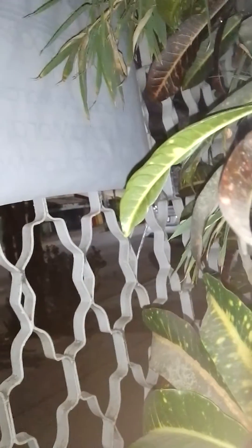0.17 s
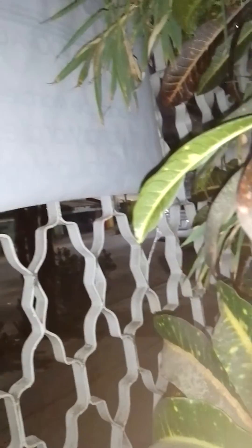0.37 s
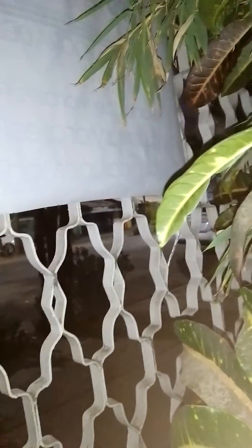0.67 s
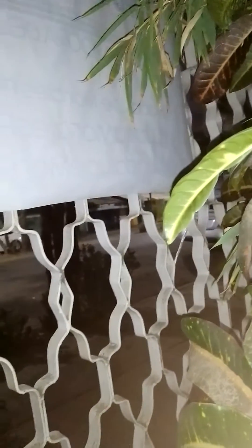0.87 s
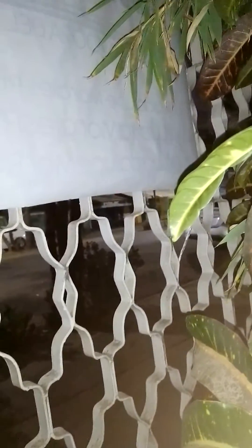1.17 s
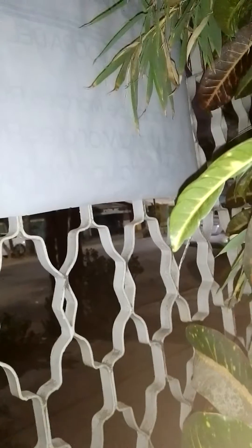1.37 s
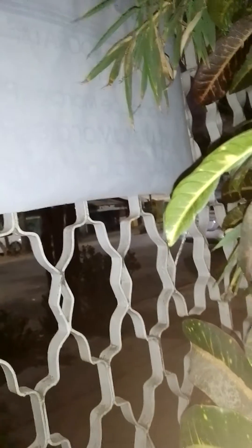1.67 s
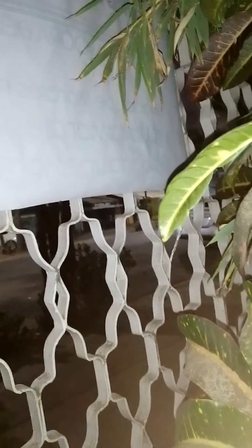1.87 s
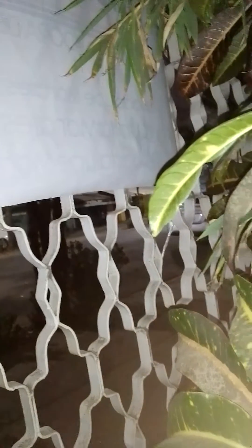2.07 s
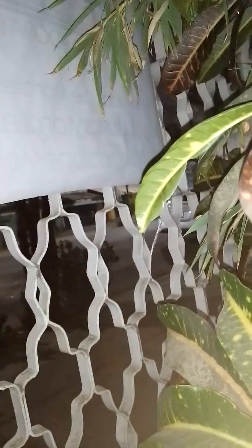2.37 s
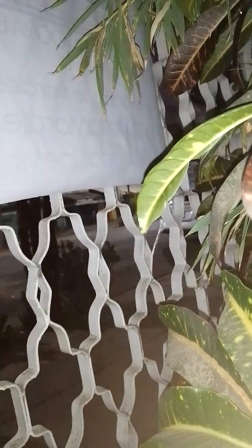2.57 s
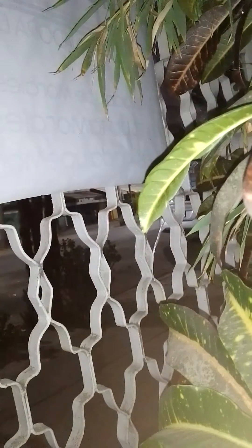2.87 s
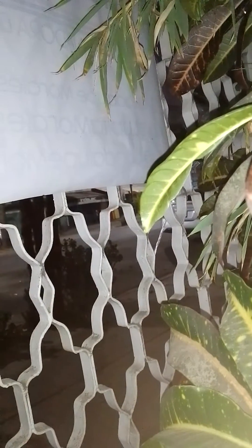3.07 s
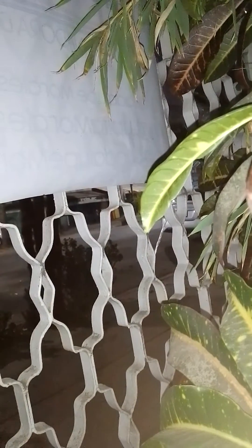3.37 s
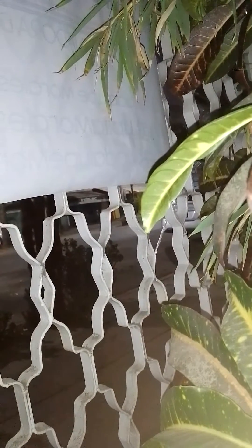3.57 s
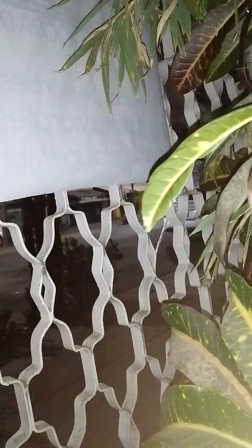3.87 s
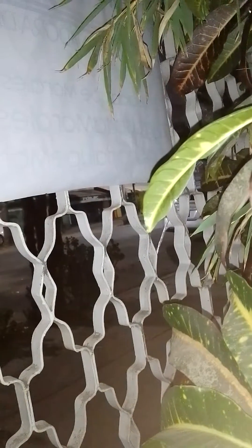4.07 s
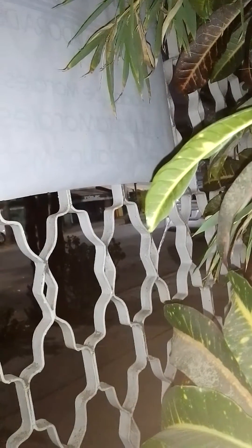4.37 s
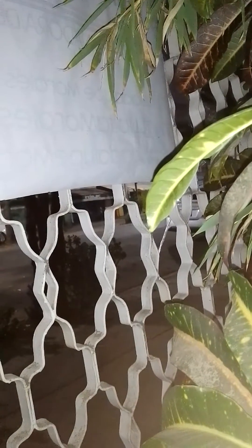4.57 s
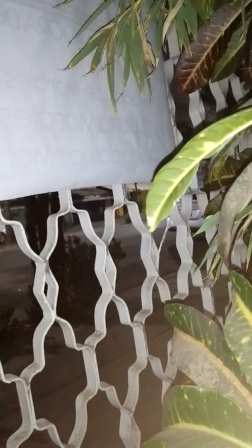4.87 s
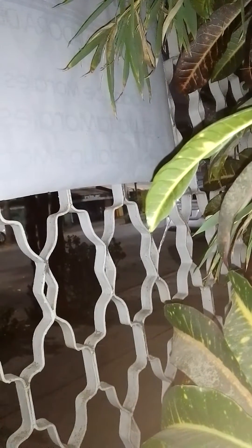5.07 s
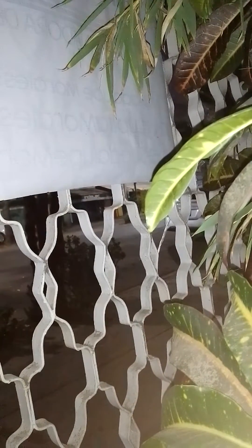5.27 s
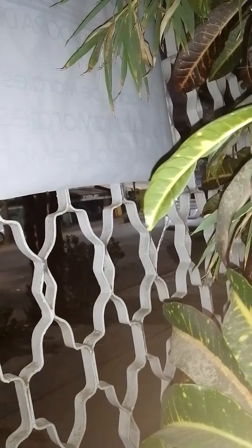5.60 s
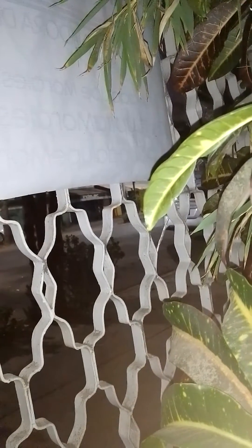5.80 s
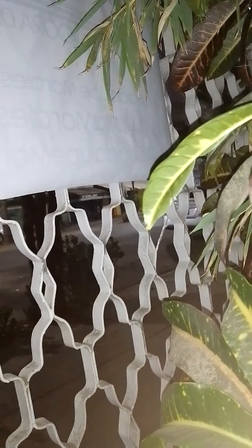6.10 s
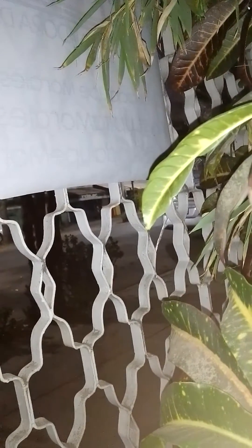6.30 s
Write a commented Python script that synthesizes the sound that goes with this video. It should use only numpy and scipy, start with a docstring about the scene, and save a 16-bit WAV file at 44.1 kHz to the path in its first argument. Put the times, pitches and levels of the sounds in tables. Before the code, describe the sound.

A busy crowd of small birds chirps near a garden fence and walls, high, scratchy and fast, with a few clearer sliding notes. There are short thinner moments but no silence. Behind them, very quiet, a street hums, tyres drone past and an engine gathers speed; a distant bird whistle slides upward before the middle. A harsh horn starts right at the end. Mono phone sound, slightly reverberant.

```python
"""Sparrows chirp hoarsely in the trees of a small garden by a street at dawn, their notes overlapping.
Each note is a trembling sine with raspy overtones, many amid fainter peeps; leaves and walls smear it with
fading noise. Far off a bird whistles and an engine gathers speed, both gliding sines, over traffic hum and
tyre drone, both filtered noise. At the end a vehicle horn sets in: steady partials over a rattle. Mono."""
import sys
import numpy as np
from scipy import signal
from scipy.fft import rfft, irfft
from scipy.io import wavfile

SR = 44100
rng = np.random.default_rng(int(sys.argv[2]) if len(sys.argv) > 2 else 0)


def how_loud(loudness_db):
    """Turn decibels into a plain amplitude multiplier (0 dB gives 1, 20 dB gives 10)."""
    steps = np.asarray(loudness_db, float) / 20
    return 10 ** steps


def waveform_to_disk(signal):
    """Save audio, clipped to [-1, 1], as 16-bit WAV at the path in sys.argv[1]."""
    frames = np.transpose(np.atleast_2d(signal))
    scaled = np.clip(frames, -1, 1) * 32767
    samples = np.round(scaled).astype(np.int16)
    wavfile.write(sys.argv[1], SR, samples)


N = 284004  # length in samples


def unit(x):
    """Scale to rms 1."""
    return x / np.sqrt(np.mean(x ** 2, axis=-1, keepdims=True))


def colour(x, points):
    """Filter by (Hz, dB) points joined on a log frequency axis."""
    hz, db = np.transpose(points)
    bins = np.maximum(np.fft.rfftfreq(len(x), 1 / SR), 1)
    gain = how_loud(np.interp(np.log(bins), np.log(hz), db))
    return irfft(rfft(x) * gain, len(x))


def wander(shape, rate_hz):
    """Random wavering: noise smoothed to the given rate, spread 1."""
    smooth = signal.butter(2, rate_hz, fs=SR, output="sos")
    return unit(signal.sosfilt(smooth, rng.standard_normal(shape)))


def band_noise(low_hz, high_hz, order, count):
    """A band of steady noise at rms 1."""
    band = signal.butter(order, [low_hz, high_hz], "bandpass", fs=SR, output="sos")
    return unit(signal.sosfilt(band, rng.standard_normal(count)))


def glide(table, waver, throb_db):
    """A sine along (s, Hz, dB rms) rows, silent outside them, its pitch and size wavering."""
    s, hz, db = np.transpose(table)
    t = np.arange(N) / SR
    pitch = np.interp(t, s, hz) * (1 + waver * wander(N, rate_hz=28.0))
    size = how_loud(np.interp(t, s, db, -140, -140) + throb_db * wander(N, rate_hz=75))
    return np.sqrt(2) * size * np.sin(2 * np.pi * np.cumsum(pitch) / SR)


def garden(x, t60_s, wet_db):
    """Leaves and walls scatter the sound: the direct wave, then a fading noise tail."""
    t = np.arange(SR // 2) / SR
    tail = rng.standard_normal(len(t)) * how_loud(-60 * t / t60_s)
    tail = how_loud(wet_db) * tail / np.sqrt(np.sum(tail ** 2))
    tail[0] = 1
    return signal.fftconvolve(x, tail)[:N]


# Tone of the street hum. Each row: frequency in Hz, relative strength per Hz of bandwidth in dB.
STREET_TONE = [(25, -20.5), (55, -32.5), (110, -13.5), (165, -23), (205, -8), (290, 1.5), (500, -4),
               (945, -5.5), (1400, -15.5), (1900, -22), (2420, -15.5), (3230, -26), (4540, -33.5),
               (15500, -30.5)]
# Tyre drone of a passing vehicle. Each row: time in seconds, level in dB rms.
TYRE_DRONE = [(0, -90), (1.5, -72), (1.8, -67), (3.1, -66), (3.5, -70), (6.44, -83)]


def street():
    """Smooth far traffic is coloured noise; a narrow band of tyre drone swells and fades in it."""
    level = how_loud(-61.0 + 0.69 * wander(N, rate_hz=18.4))
    hum = level * unit(colour(rng.standard_normal(N), STREET_TONE))
    # the upper part of the hum comes and goes in patches
    upper_band = signal.butter(2, [1250, 2600], "bandpass", fs=SR, output="sos")
    upper = signal.sosfilt(upper_band, hum)
    hum = hum + upper * (how_loud(3.5 * wander(N, rate_hz=8)) - 1)
    s, db = np.transpose(TYRE_DRONE)
    drone_level = how_loud(np.interp(np.arange(N) / SR, s, db))
    return hum + drone_level * band_noise(780, 880, 2, N)


# Far engine. Each row: time in seconds, firing rate in Hz, level in dB rms before wavering.
ENGINE_RUN = [(.7, 76, -87.5), (1.5, 88, -93), (2.0, 95, -85), (2.8, 102, -76), (3.15, 105, -79.5),
              (3.5, 109, -71), (4.2, 114.5, -83), (4.8, 118, -99), (5.6, 121, -84.5), (6.44, 124, -88)]


def engine():
    """The firing of the cylinders is heard as one low tone that climbs with engine speed."""
    return glide(ENGINE_RUN, waver=0.012, throb_db=0.5)


# Far bird whistles, one list each. Each row: time in seconds, pitch in Hz, level in dB rms before wavering.
WHISTLE_NOTES = [
    [(.6, 1500, -88), (.66, 1540, -78), (.72, 1550, -88)],
    [(1.5, 1425, -91), (1.58, 1506, -78), (1.72, 1600, -71.5), (1.8, 1545, -75)],
    [(2.47, 980, -78), (2.52, 1080, -66), (2.6, 1372, -73), (2.66, 1580, -68), (2.72, 1880, -67),
     (2.765, 2240, -62), (2.775, 2320, -85)],
]


def whistles():
    """A whistle is nearly a pure tone: one sine sliding through each list of pitches."""
    return sum(glide(note, waver=.012, throb_db=6.5) for note in WHISTLE_NOTES)


# Strong horn partials. Each row: frequency in Hz, level in dB rms before throbbing.
HORN_PARTIALS = [(1050, -67), (1136, -58), (1200, -56), (1394, -57), (1510, -61), (2178, -52.5),
                 (2224, -60), (2264, -49), (2347, -60), (2522, -51), (2649, -52.5), (2866, -52)]
# The base pitches in Hz of the two horn diaphragms.
DIAPHRAGM_HZ = (378, 349)
BUZZ_DB, BUZZ_DB_PER_KHZ = -57.5, -6.5  # level of the 9th harmonic, change above it
HORN_START_S, HORN_THROB_DB = 6.215, 5


def horn():
    """Buzzing diaphragms: partials of steady pitch and throbbing level over a rattle, swelling in."""
    t = np.arange(N - int(HORN_START_S * SR)) / SR
    # a thin upper buzz of harmonics that fade with pitch
    buzz = [(k * hz, BUZZ_DB + BUZZ_DB_PER_KHZ * (k - 9) * hz / 1000)
            for hz in DIAPHRAGM_HZ for k in range(9, 22)]
    partials = list(HORN_PARTIALS) + buzz
    throbs = wander((len(partials), len(t)), rate_hz=110)
    phases = rng.uniform(0, 2 * np.pi, len(partials))
    tone = np.zeros(len(t))
    for (hz, db), throb, phase in zip(partials, throbs, phases):
        level = np.sqrt(2) * how_loud(db + HORN_THROB_DB * throb)
        tone += level * np.sin(2 * np.pi * hz * t + phase)
    rattle = how_loud(-50) * band_noise(2100, 6500, 4, len(t))
    swell = 1 - np.exp(-t / .07)
    return np.r_[np.zeros(N - len(t)), (tone + rattle) * swell]


# Overtones of a sparrow note. Each row: multiple of the pitch, level in dB added to the note's overtone level.
NOTE_OVERTONES = [(2, -0.5), (3, 1.5), (4, -3)]


def voice(hz, db, over_db, size):
    """The note sung along a pitch and level; gives the note and its raspier overtones."""
    n = len(hz)
    phase = 2 * np.pi * np.cumsum(hz) / SR
    rasp = 2 * np.pi * np.cumsum(200 * size[::-1][:n]) / SR  # pitch tremble, spread 200 Hz
    shape = how_loud(db) * np.sin(np.pi * np.arange(n) / n) ** 0.75
    over = np.zeros(n)
    for k, relative_db in NOTE_OVERTONES:
        audible = k * hz < .45 * SR
        over += how_loud(over_db + relative_db) * audible * np.sin(round(k) * phase + rasp)
    return np.array([shape * np.sin(phase), shape * over])


# birds at LEVEL_HZ and above have no sag; the flick is FLICK_HZ deep at LEVEL_HZ and shallower below
LEVEL_HZ, FLICK_HZ, FLICK_S = 5958, 612, 0.00491


def chirp(length, mid_hz, sag_hz_per_s, db, over_db, pitch, size):
    """One hoarse note that flicks up to its pitch from below and sags, trembling in pitch and size."""
    t = np.arange(int(np.clip(length, .01, .14) * SR)) / SR
    sag = sag_hz_per_s * (t - t[-1] / 2)
    flick = FLICK_HZ * (mid_hz / LEVEL_HZ) ** 2 * np.exp(-t / FLICK_S)
    hz = mid_hz - sag - flick + 95 * pitch[:len(t)]
    return voice(hz, db + 9 * np.tanh(size[:len(t)] / 2), over_db, size)


def slur(rise, fall, start_hz, turn_hz, end_hz, db, over_db, pitch, size):
    """One clearer note that glides to its turning pitch, then slides to its end, fast at first."""
    t = np.arange(int((rise + fall) * SR)) / SR
    up = np.clip(t / rise, 0, 1)
    down = np.clip((t - rise) / fall, 0, 1) ** .75  # a power under 1 is steep first
    hz = start_hz + (turn_hz - start_hz) * up + (end_hz - turn_hz) * down
    return voice(hz + 105 * pitch[:len(t)], db + 6 * size[:len(t)], over_db, size)


def add(out, s, part):
    """Mix a part into out from time s."""
    start = int(max(s, 0) * SR)
    out[:, start:start + part.shape[1]] += part


# Peeps around a chirp: typical fall rate and length, mean level against the chirp and its spread
PEEP_SAG_HZ_PER_S, PEEP_S = 7020, 0.034
PEEP_DB, PEEP_SCATTER_DB = -9.5, 4.5


def peeps(out, row, pitch, size, count=15):
    """Short, mostly fainter peeps on pitches near a chirp, the later ones tending lower."""
    s, length, hz, db, over_db = row
    for k, (off, slope, loud, long) in enumerate(rng.standard_normal((count, 4))):
        late = k / count
        spread_hz = 600 * (.6 + .7 * late)
        shift_hz = spread_hz * np.clip(off, -1.6, 1.6) + 502 * (.3 - late)
        peep_hz = np.clip(hz + shift_hz, 2850, 6400)
        sag = PEEP_SAG_HZ_PER_S * np.clip(1 + slope, -1, 2)
        peep_db = db + PEEP_DB + PEEP_SCATTER_DB * loud
        peep = chirp(PEEP_S * how_loud(2.54 * long), peep_hz, sag, peep_db, over_db,
                     pitch[::-1][400 * k:], size[400 * k:])
        add(out, s + (length + PEEP_S) * late - .006, peep)


# Sparrow chirps. Each row: start in seconds, length in seconds (held to 0.01-0.14 when sung), pitch in Hz,
# level in dB before trembling, overtone level in dB against the note.
CHIRP_NOTES = [(0, 0.016, 3440, -51.5, -29), (0.067, 0.032, 5660, -61, 1), (0.081, 0.076, 4380, -45, -22),
               (0.115, 0.11, 3575, -47, -42), (0.209, 0.049, 3220, -57, -26),
               (0.362, 0.051, 5800, -46, -10), (0.376, .11, 3927, -44, -17),
               (0.38, 0.041, 6040, -48.5, -23), (0.444, 0.093, 5080, -43.5, -11),
               (0.464, 0.078, 4095, -41, -8), (0.615, 0.11, 4840, -46, -15), (0.644, 0.061, 3725, -46, -15),
               (0.705, 0.096, 3853, -39, -21), (0.822, 0.078, 3230, -49.5, -46),
               (1.01, 0.044, 4060, -46.5, -33), (1.047, 0.065, 3222, -43, -32),
               (1.133, 0.054, 4990, -43.5, -9.5), (1.179, 0.085, 4060, -41, -19.5),
               (1.221, 0.12, 3680, -45.5, -18.5), (1.333, 0.076, 4110, -40.5, -19.5),
               (1.337, 0.1, 3480, -43, -31), (1.449, 0.047, 6570, -58.5, -9),
               (1.466, 0.11, 3457, -42.5, -30), (1.483, 0.043, 5780, -47, -10),
               (1.58, 0.063, 5125, -48, -9), (1.632, 0.18, 3680, -46.5, -9), (1.692, 0.092, 4690, -52, -2),
               (1.778, 0.033, 4755, -41.5, -10), (1.824, 0.032, 4390, -38, -29),
               (1.841, 0.058, 3630, -40, -26.5), (1.957, 0.031, 4790, -45.5, -12),
               (1.985, 0.13, 4175, -43, -17.5), (2.004, 0.088, 3143, -46.5, -14),
               (2.084, 0.078, 3494, -43.5, -23), (2.296, 0.029, 5220, -56.5, -11),
               (2.36, 0.12, 3270, -52, -14), (2.364, 0.075, 5470, -52, -19),
               (2.539, 0.045, 4780, -42.5, -10.5), (2.563, 0.095, 3770, -40.5, -20),
               (2.723, 0.052, 4750, -46.5, -6.5), (2.759, 0.067, 4020, -39, -21),
               (2.866, 0.096, 4700, -43, -21), (2.867, 0.072, 3167, -43.5, -14.5),
               (2.873, 0.07, 5990, -49.5, -6.5), (2.952, 0.046, 3465, -41, -28),
               (3.042, 0.049, 3960, -49, -25.5), (3.364, 0.043, 4504, -43.5, -11),
               (3.375, 0.082, 5650, -52.5, -13), (3.401, 0.1, 3596, -50, -16),
               (3.484, 0.046, 4700, -51, -17), (3.533, 0.036, 3934, -50, -22),
               (3.63, 0.087, 3964, -44, -29), (3.676, 0.057, 3193, -45, -22.5),
               (3.739, 0.067, 4684, -44, -11), (3.799, 0.064, 3734, -41, -13.5),
               (3.908, 0.044, 5360, -47, -5), (3.929, 0.12, 3720, -43, -16), (3.968, 0.03, 5660, -47, -7.5),
               (4.077, 0.095, 5030, -45, -15), (4.107, 0.041, 4200, -44, -11.5),
               (4.143, 0.18, 3690, -44, -20), (4.231, 0.052, 4350, -45, -27),
               (4.3, 0.067, 4075, -39, -20.5), (4.359, 0.068, 3710, -39, -24),
               (4.467, 0.052, 3900, -44, -18.5), (4.502, 0.056, 3054, -47.5, -23),
               (4.607, 0.062, 5080, -57.5, -16), (4.707, 0.055, 5790, -47, -12.5),
               (4.795, 0.05, 4280, -50.5, -28), (4.892, 0.21, 3416, -48.5, -23.5),
               (4.958, 0.068, 5140, -57, -8), (4.986, 0.056, 4530, -44, -20), (5.008, 0.05, 5640, -52, -8),
               (5.065, 0.15, 3710, -40.5, -21), (5.066, 0.16, 4840, -42.5, -15),
               (5.215, 0.05, 4880, -51, -3.5), (5.273, 0.059, 3990, -41.5, -20),
               (5.365, 0.042, 3465, -51, -14), (5.382, 0.036, 5740, -46.5, -13),
               (5.469, 0.03, 4410, -50, -24), (5.519, 0.066, 3230, -57.5, -36),
               (5.693, 0.11, 3470, -54.5, -13.5), (5.742, 0.038, 6060, -54, 1),
               (5.765, 0.042, 4560, -48, -10), (5.802, 0.091, 3840, -52, -15),
               (5.9, 0.056, 4077, -40.5, -26), (5.942, 0.073, 5780, -46.5, -6),
               (5.943, 0.041, 3573, -40, -16), (5.975, 0.058, 4270, -40.5, -11),
               (5.988, 0.15, 3634, -43, -19), (6.178, 0.089, 4020, -44, -19),
               (6.209, 0.035, 4910, -44.5, -15), (6.269, 0.07, 3470, -40.5, -19),
               (6.378, 0.046, 4054, -44.5, -28), (6.405, 0.04, 3250, -42.5, -26)]
# Clear slurred notes, with no peeps around them. Each row: start in seconds, time to the turning pitch in
# seconds, slide after it in seconds, start pitch in Hz, turning pitch in Hz, end pitch in Hz,
# level in dB before trembling, overtone level in dB against the note.
SLUR_NOTES = [(.313, .008, 0.047, 4700, 4210, 4110, -47.5, -15.5),
              (.535, 0.012, 0.058, 4950, 5180, 5060, -39, -18),
              (0.11, 0.013, 0.21, 4500, 4970, 3400, -52, -35),
              (3.525, 0.025, 0.053, 3300, 4270, 2797, -46, -24.5),
              (1.3, 0.0064, 0.092, 7100, 5900, 4300, -54, -23),
              (3.095, 0.015, 0.049, 2950, 3600, 2200, -46, -50),
              (2.306, .015, 0.18, 2500, 4230, 2850, -50, -27),
              (2.343, 0.032, 0.13, 5100, 6160, 4690, -45.5, -16.5),
              (2.498, .01, 0.036, 2690, 5300, 3200, -39, -15),
              (3.339, 0.029, 0.072, 5100, 6240, 6030, -51.5, -10),
              (3.359, 0.012, 0.092, 3316, 4700, 3900, -44.5, -17.5),
              (4.632, 0.01, 0.11, 3750, 4210, 2670, -49.5, -20),
              (4.984, 0.087, 0.03, 5200, 6440, 4700, -48.5, -11),
              (5.674, 0.026, 0.061, 2700, 4490, 3290, -46, -18.5)]
# Beak and microphone colour of the overtones. Each row: frequency in Hz, gain in dB.
OVERTONE_COLOUR = [(2000, -31), (6000, 5), (7000, -7), (9000, -16.5), (10500, -13.5), (12000, -3),
                   (14000, -6), (16000, -6)]


def sparrows():
    """Small throats sing chirps amid chattering peeps, and clear slurs; gives notes and overtones apart."""
    out = np.zeros((2, N + SR))
    flutter = wander((len(CHIRP_NOTES), 2, 12000), rate_hz=325)
    for row, (pitch, size) in zip(CHIRP_NOTES, flutter):
        s, length, hz, db, over_db = row
        sag = 5500 * np.clip((LEVEL_HZ - hz) / 1500, 0, 1)  # Hz per second, lower birds sag more
        add(out, s, chirp(length, hz, sag, db, over_db, pitch, size))
        peeps(out, row, pitch, size)
    flutter = wander((len(SLUR_NOTES), 2, 12000), rate_hz=260)
    for (s, *shape), (pitch, size) in zip(SLUR_NOTES, flutter):
        add(out, s, slur(*shape, pitch, size))
    # so small a throat gives little below its lowest notes
    throat = signal.butter(4, 2450, "highpass", fs=SR, output="sos")
    return signal.sosfilt(throat, out[0, :N]), colour(out[1, :N], OVERTONE_COLOUR)


def scene():
    """Birds ring in the garden, their overtones more briefly; street, engine, whistles and horn join them."""
    far = garden(whistles(), t60_s=0.12, wet_db=-4)
    blare = garden(horn(), t60_s=0.2, wet_db=-6)
    notes, overtones = sparrows()
    birds = garden(notes, t60_s=0.36, wet_db=-3.5) + garden(overtones, t60_s=0.09, wet_db=2.0)
    return (street() + engine() + far + blare + birds)[None]


def band_limit(x):
    """A steep low-pass at the top of the band."""
    return signal.sosfilt(signal.butter(12, 15710, fs=SR, output="sos"), x)


def record(dry):
    """The phone cuts the top, steeply above 15750 Hz."""
    top_cut = signal.ellip(8, .2, 70, 15750, fs=SR, output="sos")
    mix = signal.sosfilt(top_cut, dry)
    return band_limit(mix)


dry = scene()
out = record(dry)
waveform_to_disk(out)
```